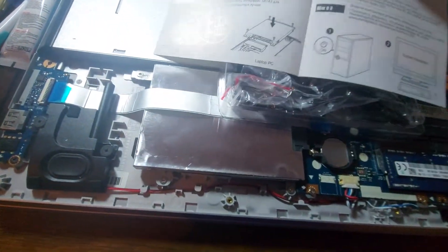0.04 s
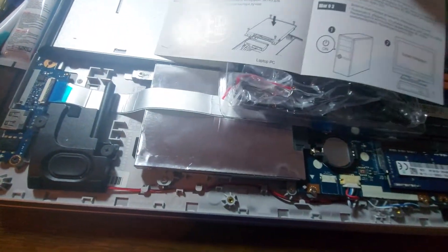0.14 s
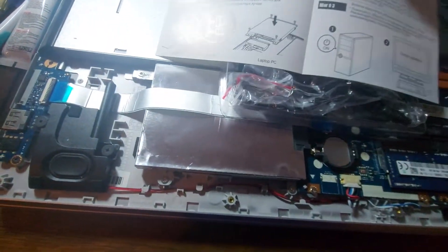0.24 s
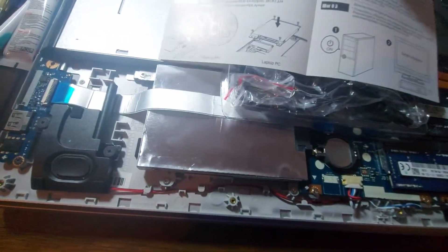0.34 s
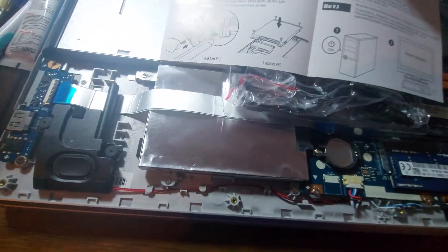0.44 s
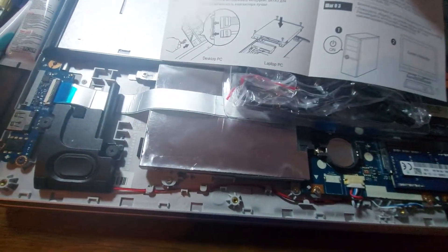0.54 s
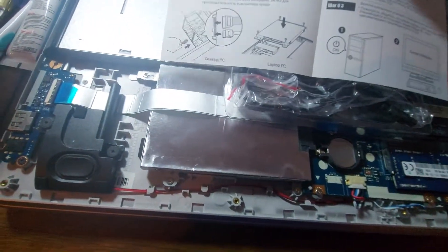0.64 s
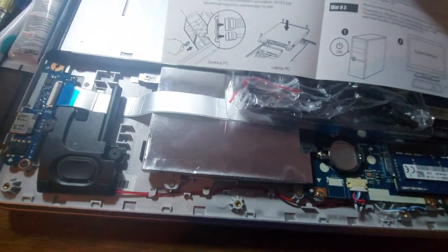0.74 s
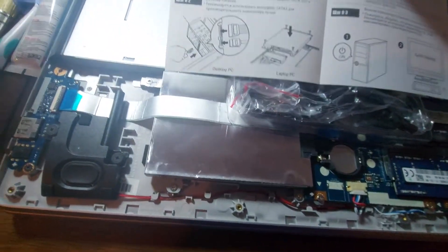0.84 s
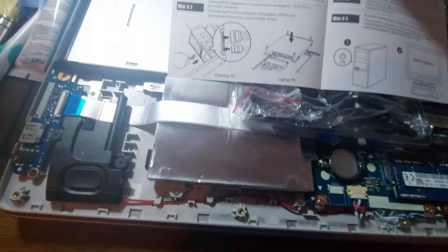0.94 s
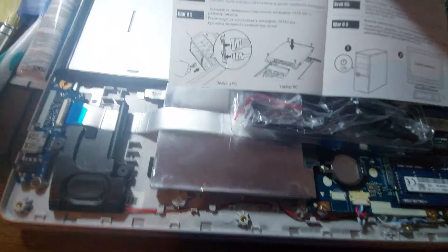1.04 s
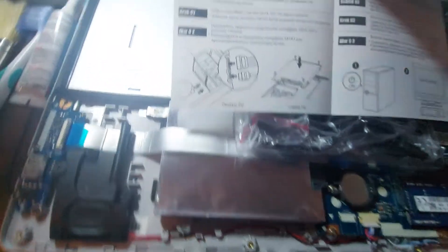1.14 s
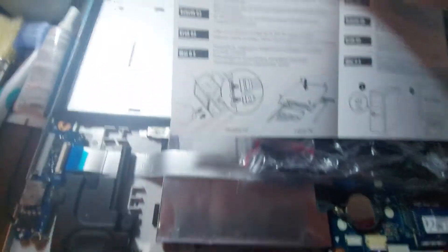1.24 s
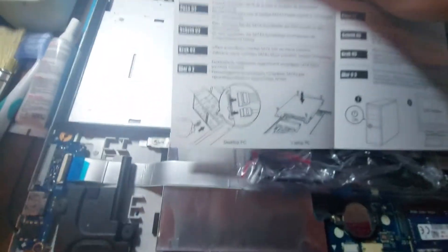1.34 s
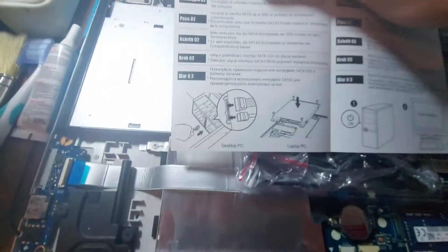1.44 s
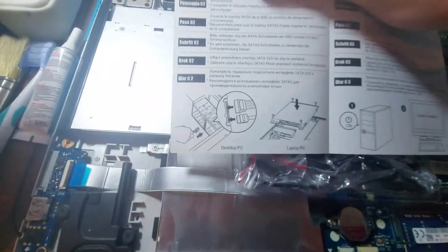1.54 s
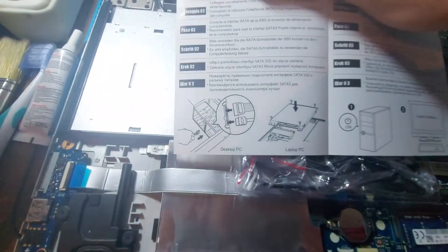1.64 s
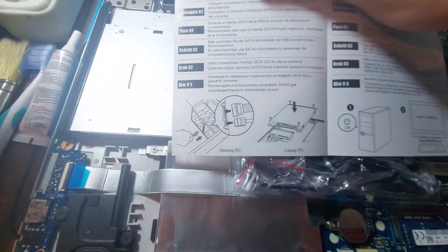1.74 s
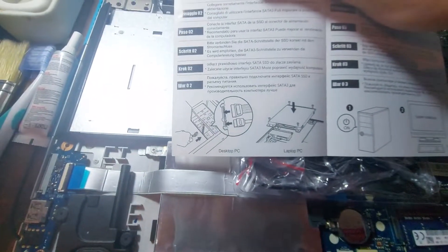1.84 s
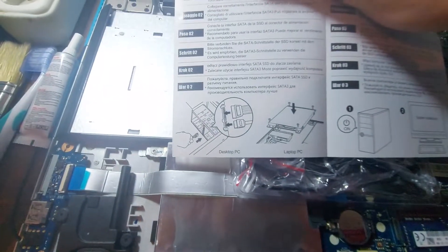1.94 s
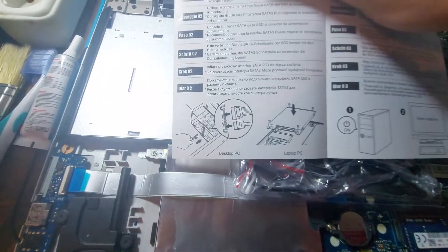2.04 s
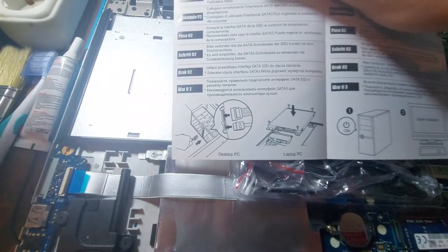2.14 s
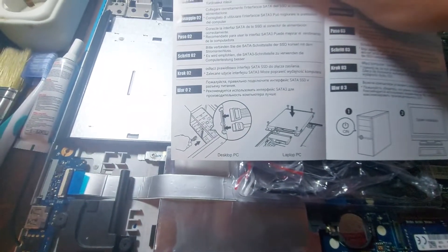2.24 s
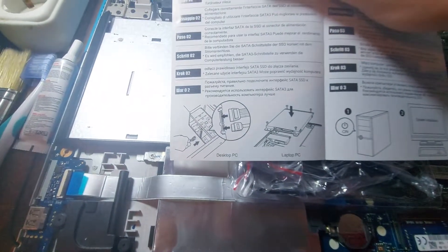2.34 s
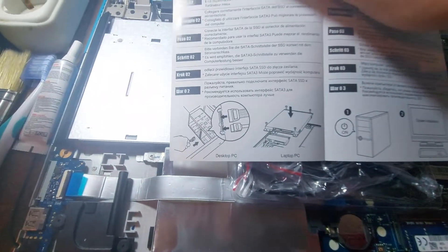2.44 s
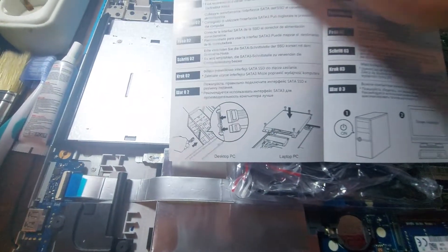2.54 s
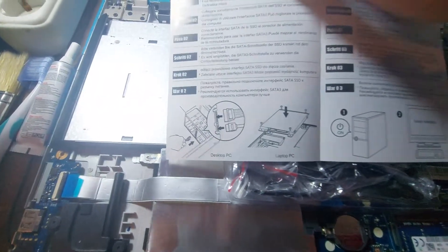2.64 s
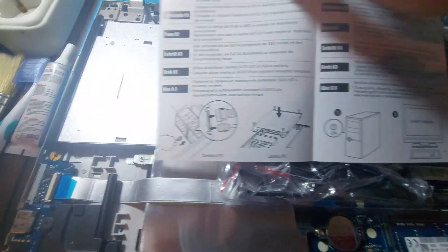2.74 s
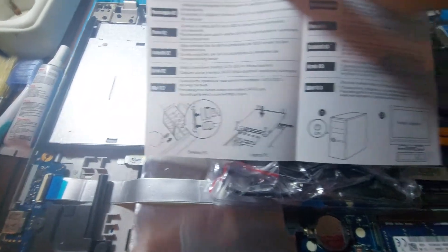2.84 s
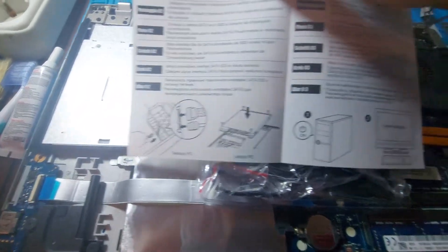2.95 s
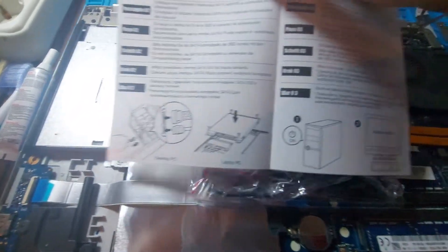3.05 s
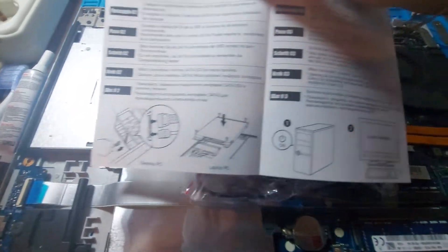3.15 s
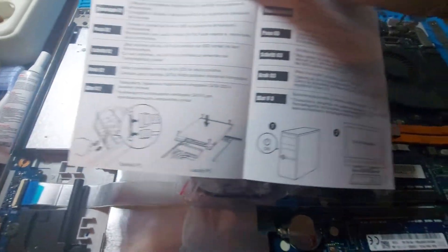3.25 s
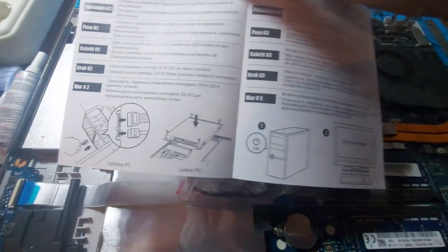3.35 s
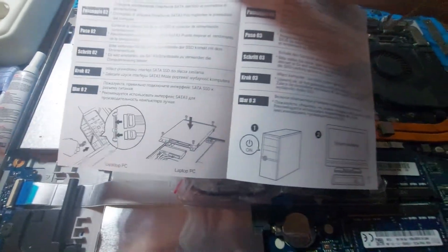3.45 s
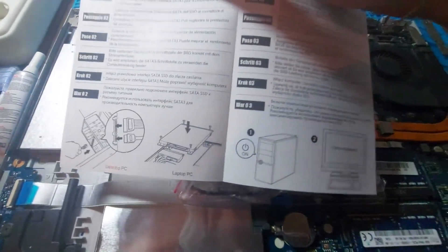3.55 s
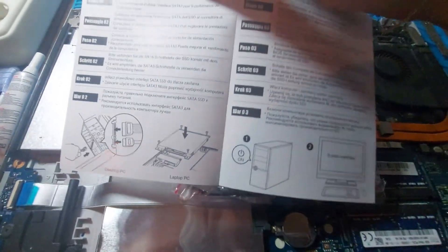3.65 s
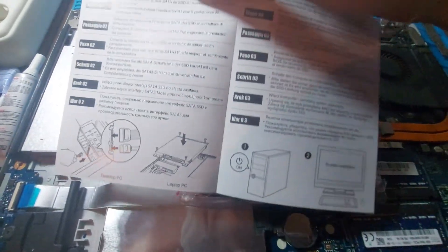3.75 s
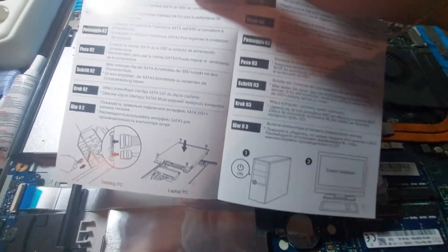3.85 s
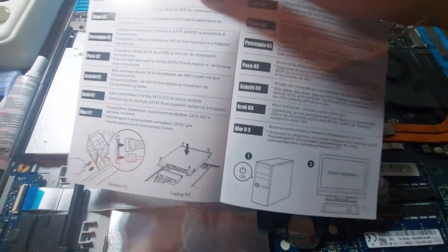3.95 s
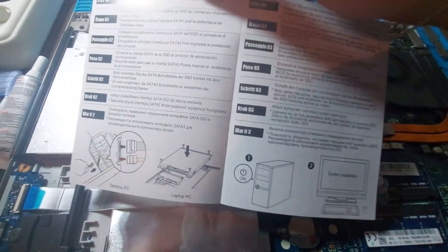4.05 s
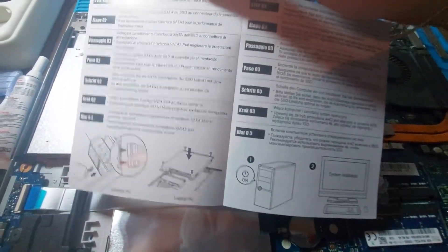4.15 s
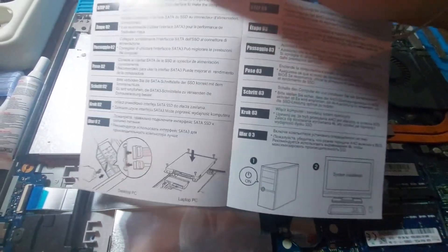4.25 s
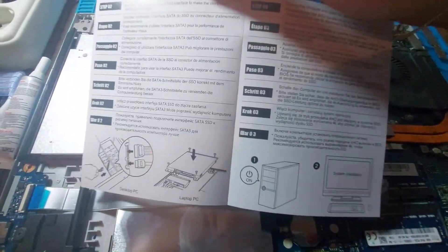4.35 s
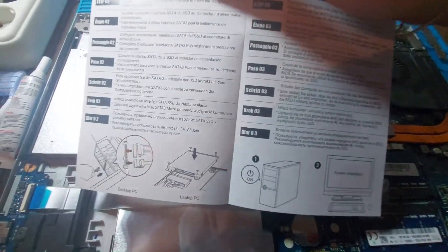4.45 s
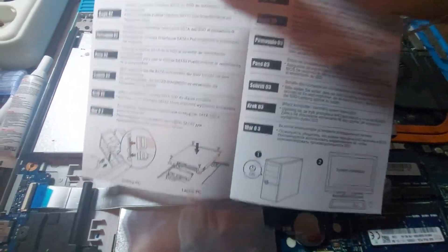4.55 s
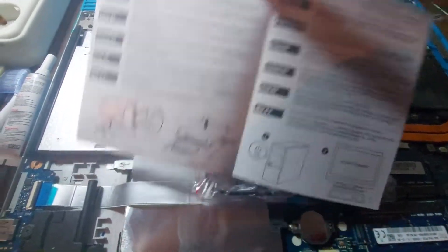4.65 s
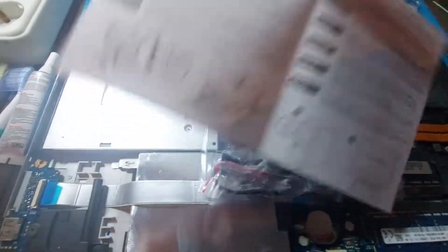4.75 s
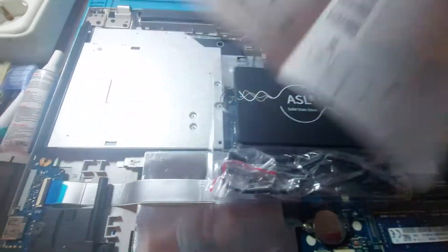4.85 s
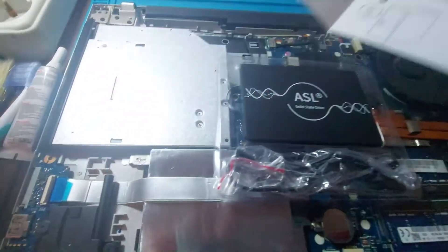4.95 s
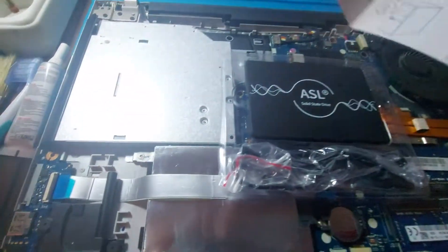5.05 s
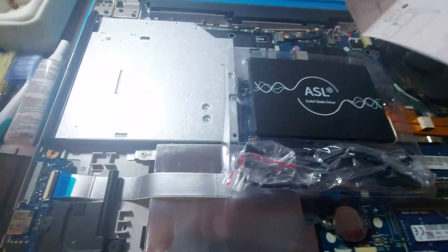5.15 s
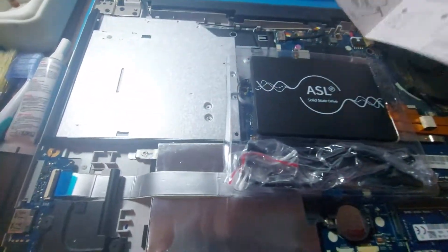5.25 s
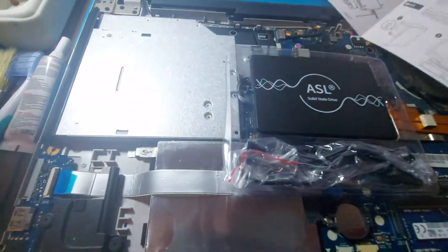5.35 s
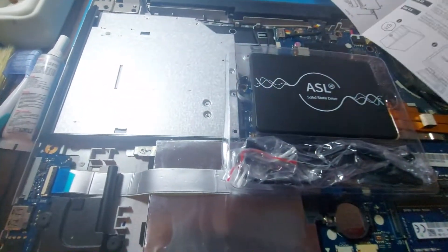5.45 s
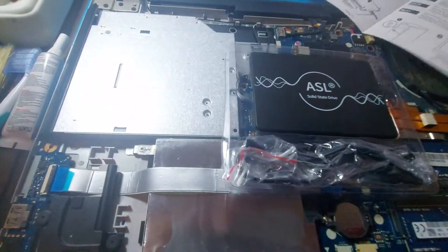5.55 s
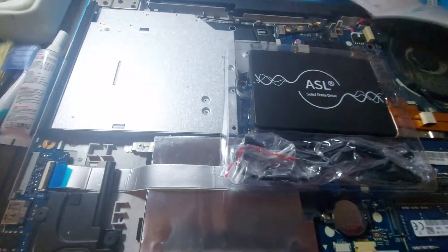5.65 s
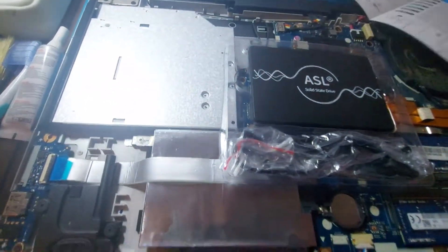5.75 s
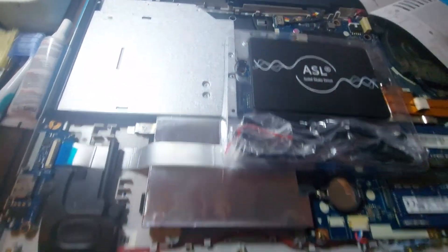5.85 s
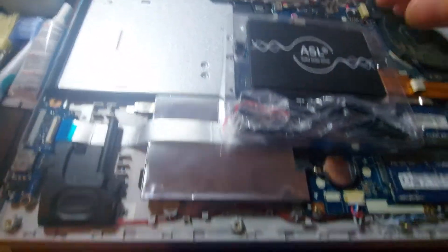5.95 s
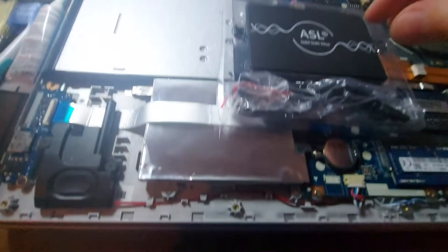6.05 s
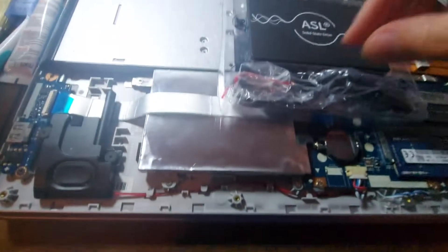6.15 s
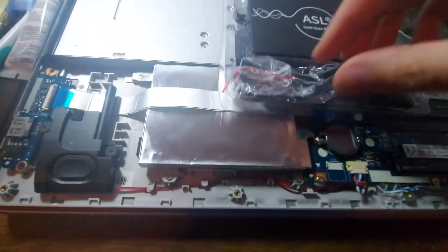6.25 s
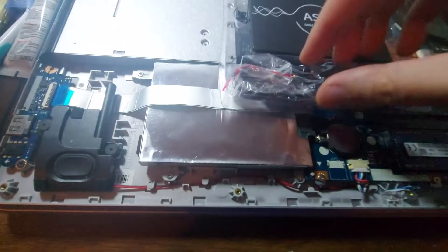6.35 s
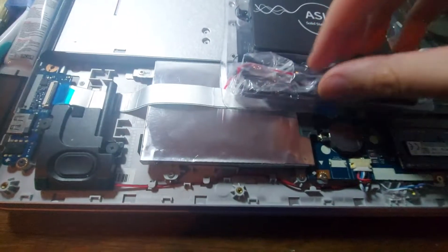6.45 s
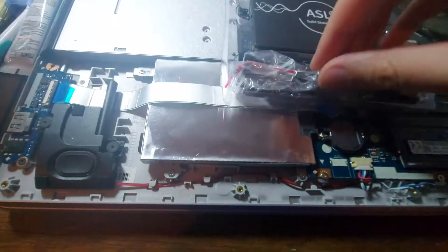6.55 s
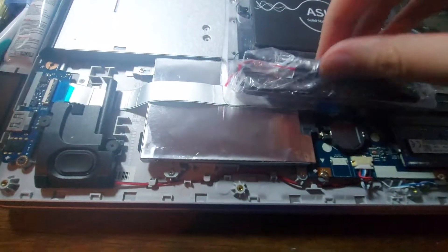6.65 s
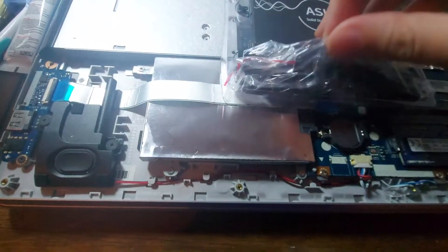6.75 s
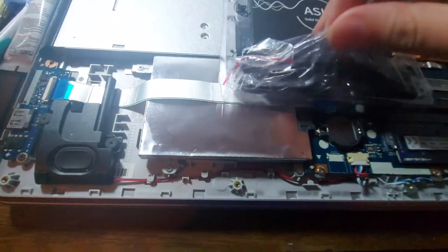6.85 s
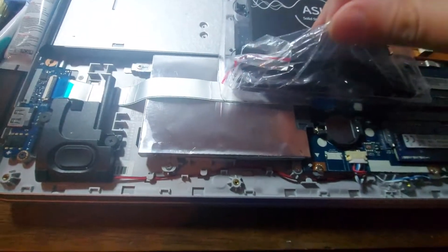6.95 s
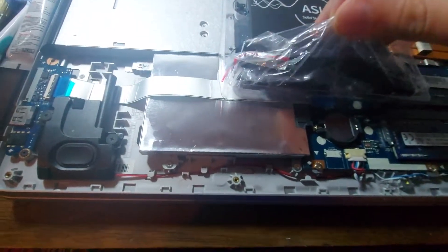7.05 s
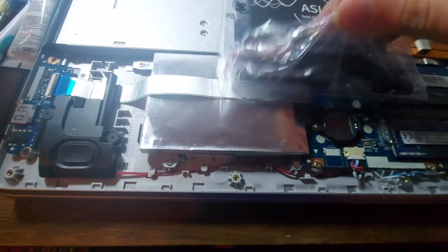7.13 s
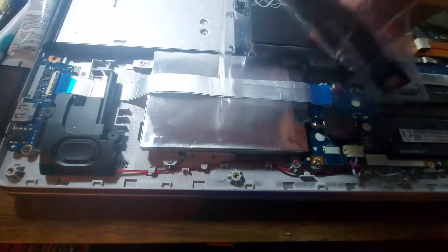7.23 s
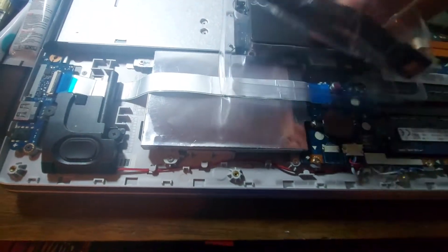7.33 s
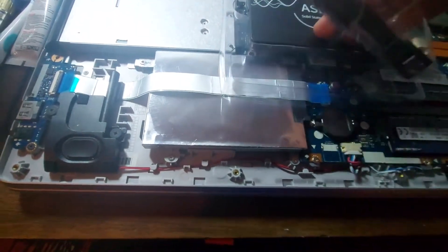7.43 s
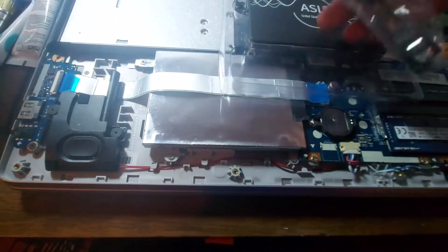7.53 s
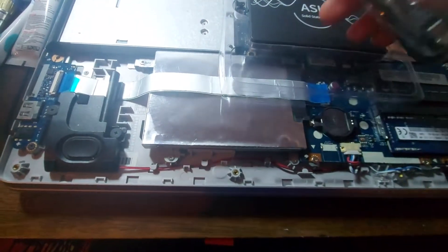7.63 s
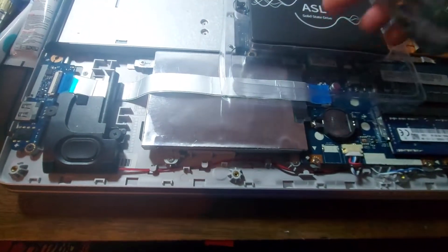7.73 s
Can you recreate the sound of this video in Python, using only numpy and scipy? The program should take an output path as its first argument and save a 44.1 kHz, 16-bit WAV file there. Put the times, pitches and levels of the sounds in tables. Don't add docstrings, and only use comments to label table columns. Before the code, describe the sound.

Close stereo pickup in a small quiet room with a faint, low fan hum. A glossy leaflet gives a small crease and soft finger slides, then long near-silence with sparse ticks. It is turned and folded with papery snaps and swishes, then a thin plastic bag is pinched and pulled, crackling brightly and much louder, ending with scattered tray clicks.

```python
import sys
import numpy as np
from scipy import signal
from scipy.fft import rfft, irfft, next_fast_len
from scipy.io import wavfile

SR = 44100
rng = np.random.default_rng(int(sys.argv[2]) if len(sys.argv) > 2 else 0)


def convert_level_to_amplitude(level_db):
    exponent = np.asarray(level_db, float) / 20
    return 10 ** exponent


def int16_out(signal):
    q = np.round(np.clip(np.atleast_2d(signal).T, -1, 1) * 32767)
    wavfile.write(sys.argv[1], SR, q.astype(np.int16))


N = 343539
LEFT_RIGHT = np.array([[1], [-1]])


def pan(left_over_right_db):
    return convert_level_to_amplitude(left_over_right_db / 2 * LEFT_RIGHT)


def at_hz(points, hz):
    point_hz, value = np.transpose(points)
    return np.interp(np.log(hz), np.log(point_hz), value)


def rms_one(x):
    return x / np.sqrt(np.mean(x ** 2) + 1e-20)


def drift(rate):
    targets = rng.standard_normal(int(8 * rate) + 2)
    return rms_one(np.interp(np.arange(N) * rate / SR, np.arange(len(targets)), targets))


def resonance(x, hz, width_hz):
    r = np.exp(-np.pi * width_hz / SR)
    feedback = [1, -2 * r * np.cos(2 * np.pi * hz / SR), r * r]
    return signal.lfilter([(1 - r * r) / 2, 0, (r * r - 1) / 2], feedback, x)


def pair(two, alike):
    alike = np.clip(alike, -.99, .99)
    shared = np.sqrt(1 + alike) * two[0]
    opposed = np.sqrt(1 - alike) * two[1] * LEFT_RIGHT
    return (shared + opposed) / np.sqrt(2)


def moves(rows):
    rows, t = np.array(rows), np.arange(N) / SR
    current = np.maximum(np.searchsorted(rows[:, 0], t, "right") - 1, 0)
    start, rise, level_db, fade, *more = rows[current].T
    late = t - start - rise
    swell_db = 12.5 * late / np.maximum(rise, .001)
    under_db = np.where(late < 0, swell_db, -fade * late)
    return np.where(t < start, -140, level_db), np.maximum(under_db, -90), *more


def grains(per_s, spread_db, clump_db, grain_s, smooth, likeness):
    born = rng.random(N) < per_s * convert_level_to_amplitude(clump_db * drift(40)) / SR
    power = born * convert_level_to_amplitude(2 * spread_db * np.minimum(rng.exponential(1, N), 4))
    fade = np.exp(-1 / (grain_s * SR))
    gate = np.sqrt(smooth + signal.lfilter([1], [1, -fade], rms_one(power) + 1e-18))
    return [rms_one(gate * pair(rng.standard_normal((2, N)), alike)) for alike in likeness]


def add_crease(drive, s, levels_db, ring_band, ring_hz, t60, pan_db, ring_share, likeness, click, lag,
               top_hz=SR * .45):
    at, t = int(s * SR), np.arange(3000) / SR
    noise = rng.standard_normal((3, 2, len(t)))
    for band, (db, life) in enumerate(zip(levels_db, [1.4, 1, .6])):
        burst = pair(noise[band], likeness[band]) * convert_level_to_amplitude(-60 * t / (t60 * life))
        burst[:, 0] = click
        if band == 2:
            burst = signal.lfilter(*signal.butter(2, min(top_hz, SR * .45), fs=SR), burst)
        if band == ring_band:
            ring = resonance(burst, ring_hz, ring_hz / 5)
            burst = burst + ring_share * ring * np.sqrt(np.sum(burst ** 2) / np.sum(ring ** 2))
        burst = burst * convert_level_to_amplitude(db) * pan(pan_db)
        for port, start in enumerate([at + lag, at]):
            drive[band, port, start:start + len(t)] += burst[port, :N - start]


def coloured(drive, bands_hz, colour, sides, size=2048):
    hz, out = np.maximum(np.arange(size // 2 + 1) * SR / size, 10), 0
    for part, (low_hz, high_hz) in zip(drive, bands_hz):
        edges = np.sqrt((1 + (low_hz / hz) ** 8) * (1 + (hz / high_hz) ** 8))
        shape = convert_level_to_amplitude(at_hz(colour, hz)) / edges + 1e-9
        ports = shape / np.sqrt(np.mean(shape ** 2)) * pan(at_hz(sides, hz))
        cepstrum = irfft(np.log(ports))
        cepstrum[:, 1:size // 2] *= 2
        cepstrum[:, size // 2 + 1:] = 0
        response = irfft(np.exp(rfft(cepstrum)))
        out = out + signal.oaconvolve(part, response, axes=1)[:, :N]
    return out


# f/Hz, level/dB
AIR_COLOUR = [(25, -24), (50, -6.5), (110, -15.5), (250, -24), (400, -17), (680, -23.5), (900, -32),
              (1600, -28), (2300, -36), (2600, -44), (6000, -51.5), (9000, -46), (12500, -39),
              (14700, -48.5), (15200, -71)]
# f/Hz, likeness/1
AIR_LIKENESS = [(60, 0.89), (130, 0.91), (290, 0.29), (640, 0.18), (1410, 0.77), (3100, -0.35),
                (6820, -0.048), (15000, 0.19)]
# f/Hz, left over right level/dB
AIR_SIDES = [(60, -2.5), (130, -2.0), (290, 0.0), (640, 0.5), (1410, 10.5), (3100, 3.5), (6820, -2),
             (15000, 6.5)]
# f/Hz, width/Hz, level/dB, likeness/1
HUM = [(63.9, 8, -67.5, .9), (72, 19, -67, 1), (145, 10.8, -63, 0.97), (213.1, 7.9, -74, 1),
       (287.4, 26, -67, 1), (309.5, 28, -67, 1), (478, 40, -79, 0.49), (574, 20, -79, 0.94)]
# t/s, level/dB
SWELL = [
    (0.0, -59),
    (0.52, -62.5),
    (1.71, -59),
    (1.99, -62.5),
    (2.93, -59.5),
    (4.47, -64.5),
    (4.88, -60),
    (5.79, -64),
    (7.79, -61.5),
]


def room_tone():
    hz = np.maximum(np.arange(N // 2 + 1) * SR / N, 10)
    two = rfft(rng.standard_normal((2, N))) * convert_level_to_amplitude(at_hz(AIR_COLOUR, hz))
    ports = pair(two, at_hz(AIR_LIKENESS, hz)) * pan(at_hz(AIR_SIDES, hz))
    air = convert_level_to_amplitude(-66) * rms_one(irfft(ports, N))
    white = rng.standard_normal((2, N))
    swell_db = np.interp(np.arange(N) / SR, *np.transpose(SWELL)) + 61
    for mode_hz, width_hz, db, alike in HUM:
        mode = resonance(pair(white, alike), mode_hz, width_hz)
        mode = rms_one(resonance(mode, mode_hz, 1.63 * width_hz))
        level_db = db + (mode_hz < 200) * swell_db
        air = air + convert_level_to_amplitude(level_db) * pan(at_hz(AIR_SIDES, mode_hz)) * mode
    return np.array([np.roll(air[0], 17), air[1]])


def room(x):
    t60_s, wall_cut_hz, level_db = 0.15, 1330, -9.5
    size = next_fast_len(N + SR)
    w = 2 * np.pi * np.arange(size // 2 + 1) / size
    dull = 1 / (1 + 1j * w * SR / (2 * np.pi * wall_cut_hz))
    loops = np.zeros((2, len(w)), complex)
    for k, lag in enumerate((rng.uniform(.006, .03, 12) * SR).astype(int)):
        turn = dull * convert_level_to_amplitude(-60 * lag / SR / t60_s) * np.exp(-1j * w * lag)
        loops[k % 2] += (-1) ** (k // 2) * turn / (1 - turn)
    return convert_level_to_amplitude(level_db) * irfft(loops * rfft(x.mean(axis=0), size), size)[:, :N]


# t/s, peak level/dB, length/s
THUMPS = [
    (2.79, -32, 0.15),
    (5.296, -40, 0.081),
    (7.14, -38, 0.25),
]


def thumps():
    t = np.arange(N) / SR
    low = rms_one(resonance(resonance(rng.standard_normal(N), 52, 40), 74, 44))
    swell = 0
    for s, db, length in THUMPS:
        third = length / 3
        swell = swell + convert_level_to_amplitude(db - 17) * np.exp(-((t - s - third) / third) ** 2)
    return low * swell


# t/s, rise/s, hiss level/dB, fade/(dB/s)
GLIDE = [(0.0, .02, -80.5, 14), (.8, 0.042, -74, 284), (2.75, 0.029, -77, 34), (3.55, 0.17, -63.5, 99),
         (3.95, .003, -82, 46), (4.61, 0.051, -60.5, 220), (4.83, .003, -64.5, 49), (5.3, .003, -76, 60.5),
         (5.47, .01, -73, 80), (5.57, 0.0081, -68.5, 156), (5.666, .002, -74, 103)]


def glide():
    port_hz, width_hz = 11800, 2500
    hiss = grains(1500, 1.5, 2.5, .002, .7, [.1])[0]
    hiss = resonance(resonance(hiss, port_hz, width_hz), port_hz, 0.88 * width_hz)
    level_db, under_db = moves(GLIDE)
    return convert_level_to_amplitude(level_db + under_db - 1) * rms_one(hiss)


# t/s, rise/s, level/dB, fade/(dB/s), f/Hz
SWISH = [(0.0, 0.0011, -53, 218, 2130), (1.3, .02, -76, 100, 1800), (1.678, 0.0043, -68, 500, 1800),
         (1.72, 0.04, -88, 53, 1800), (2.92, 0.07, -78, 90, 1750), (3.57, 0.07, -67, 80, 1900),
         (3.72, 0.01, -66.5, 50, 1700), (3.77, 0.028, -66.5, 100, 1670), (4.95, 0.004, -59, 68, 1980),
         (5.03, 0.0088, -68, 64, 1880), (5.95, 0.11, -67, 41, 1590)]
# t/s, rise/s, level/dB, fade/(dB/s), f/Hz
EDGE = [(.25, 0.03, -93, 83, 3400), (.63, .05, -86, 90, 2970), (1.678, .004, -77, 500, 3370),
        (2.92, 0.071, -75, 100, 3070), (3.0, 0.011, -79, 85, 3030), (3.56, 0.077, -70, 90, 3080),
        (3.69, 0.034, -68.5, 60, 3120), (3.77, 0.026, -71, 203, 4240), (4.95, .005, -79, 100, 4200),
        (5.03, .02, -85, 63, 3280), (6.03, 0.034, -87, 120, 3300)]


def swish():
    q, overtone, overtone_db = 4.6, 2.13, -26.5
    rub, out = grains(900, 1.5, 2.5, .003, .7, [.5])[0], 0
    for rows in (SWISH, EDGE):
        level_db, under_db, pitch_hz = moves(rows)
        for hz in {row[-1] for row in rows}:
            width_hz, high_hz = hz / q, overtone * hz
            band = rms_one(resonance(resonance(rub, hz, width_hz), hz, width_hz))
            high = rms_one(resonance(resonance(rub, high_hz, width_hz), high_hz, width_hz))
            band = band + convert_level_to_amplitude(overtone_db) * high
            out = out + band * (pitch_hz == hz) * convert_level_to_amplitude(level_db + under_db)
    return pan(5) * out


# t/s, peak level/dB, f/Hz, t60/s
PINGS = [(4.606, -46, 1840, 0.01), (4.738, -46, 2160, 0.025), (4.858, -39, 2030, 0.023),
         (4.859, -48, 4500, .01), (4.94, -54, 4400, 0.013), (4.942, -42, 400, 0.016),
         (4.952, -41.5, 1990, 0.021), (4.951, -55, 4260, 0.014), (4.97, -43, 2000, 0.025),
         (4.973, -57, 4160, 0.013), (5.112, -33, 845, 0.019), (5.127, -35.5, 990, 0.018),
         (5.138, -40, 890, 0.018), (4.958, -48, 2100, .015), (4.744, -41, 1940, 0.033),
         (4.604, -42, 2500, .006), (5.303, -27, 1410, 0.019), (5.303, -29.5, 2440, .014),
         (5.305, -35.5, 1760, 0.024), (5.31, -39, 1030, 0.03), (5.511, -48, 1623, 0.042),
         (5.63, -35, 1540, 0.027), (5.639, -29, 1530, 0.02), (5.649, -49, 1533, .12),
         (5.672, -35.5, 1323, 0.05), (5.693, -25.5, 1590, 0.019), (5.707, -48, 1500, .05),
         (6.502, -45, 930, 0.025), (6.722, -27.5, 850, 0.033), (6.762, -35, 826, 0.044),
         (6.864, -21.5, 3780, 0.01), (6.905, -39, 810, 0.052), (6.993, -35.5, 1200, 0.025),
         (7.073, -29.5, 900, 0.014), (.003, -49, 2260, 0.024), (.021, -52, 4200, .01),
         (.063, -54, 3580, .012), (0.077, -60, 3400, .01), (.103, -54, 4200, .01), (2.767, -56, 3480, .012),
         (2.794, -53, 1280, 0.017), (2.82, -45, 1770, 0.021), (2.822, -57, 3370, .02),
         (2.845, -55, 3200, 0.014), (4.677, -48, 3230, .015), (4.874, -57, 3530, .015),
         (5.303, -44, 305, 0.15), (6.345, -53, 3150, .015), (6.651, -34, 2250, .02),
         (6.658, -33, 2000, .025), (7.201, -33.5, 263, 0.051), (7.302, -29.5, 850, 0.013),
         (7.475, -46, 400, 0.12)]


def pings():
    out, t = np.zeros((2, N)), np.arange(6000) / SR
    rise = 1 - np.exp(-(t / 0.00084) ** 2)
    for s, db, hz, t60 in PINGS:
        note = convert_level_to_amplitude(db - 60 * t / t60) * rise * np.sin(2 * np.pi * hz * t)
        start = int(s * SR)
        out[:, start:start + len(t)] += note * pan(6)
    return out


# t/s, rise/s, level/dB, fade/(dB/s), crispness/dB
PAPER = [(0.0, 0.0004, -59, 63, -4), (.14, 0.0052, -74, 48, -5), (.27, 0.027, -71.5, 62, -5),
         (.62, 0.012, -77.5, 22, -4.5), (.83, 0.005, -75, 117, 0.5), (2.764, 0.056, -61, 200, -10),
         (2.88, 0.045, -74.5, 71, -1), (3.42, 0.0041, -73.5, 94, -2), (3.55, 0.09, -69, 113, -3.5),
         (3.72, 0.058, -66, 143, 1.5), (3.9, .003, -81, 12, -12), (4.6, 0.057, -63.5, 4, -5.5),
         (4.72, 0.0061, -55, 202, -8.5), (4.83, 0.019, -53, 167, -11.5), (4.91, 0.12, -61.5, 38, -2),
         (5.09, 0.032, -57, 30, -15), (5.15, 0.0026, -66, 89, -10.5), (5.3, 0.001, -52.5, 300, -5.5),
         (5.33, 0.0087, -56.5, 156, -8), (5.47, 0.13, -64.5, 4, -6.5), (5.62, 0.093, -60.5, 216, -10.5),
         (5.85, 0.25, -73.5, 32, -10), (6.27, 0.073, -69, 62, -9)]
# t/s, peak level/dB,
# crispness/dB, ring f/Hz
CREASES = [(.0024, -36, -31, 2180), (0.02, -63, -9, 2300), (0.064, -54, 0, 2400), (0.078, -40.5, -13, 850),
           (0.103, -59, 5.5, 1540), (0.216, -58, -11, 1250), (.588, -57, -9, 1550), (0.723, -53, -10, 1690),
           (0.84, -46.5, -10, 1880), (1.1061, -55, -14, 1990), (2.766, -45, -11.5, 860),
           (2.81, -43, -25, 1290), (2.831, -58, 0, 1570), (2.8452, -59, -2, 875), (3.043, -56, -14, 1830),
           (3.1791, -56, -13, 1750), (3.431, -65, 9, 3830), (3.4433, -52, -10, 790),
           (3.8819, -44.5, -37, 760), (3.9443, -54, -15.5, 1740), (4.1904, -51.5, -17, 1800),
           (5.863, -68.5, -3, 9150), (6.087, -68, 4, 1520), (6.347, -45, -19, 2040),
           (4.608, -28, -21.5, 1620), (4.629, -38.5, -14, 706), (4.679, -61.5, 9, 1770),
         (4.705, -38, -11.5, 501), (4.727, -48, -2, 598), (4.738, -34.5, -34, 2250), (4.834, -51, -2, 1790),
         (4.844, -42.5, -9, 1010), (4.858, -42, -2.5, 1960), (4.885, -31, -18, 910),
         (4.953, -43.5, -7, 2010), (4.969, -51, -3, 1990), (5.095, -41.5, -35, 990),
         (5.132, -37.5, -10, 724), (5.301, -23, -16.5, 720), (5.362, -39, -16, 580),
         (5.377, -61, -12, 2000), (5.484, -49, -12, 1310), (5.509, -49, -24, 1640), (5.586, -45, -15, 760),
         (5.629, -28, -18.5, 750), (5.639, -30, -24, 754), (5.668, -50.5, 4, 1190), (5.674, -37, -22, 700),
         (5.684, -25.5, -26, 650), (5.7, -56, -40, 2000), (5.738, -52, -24, 1550)]
# from f/Hz, to f/Hz
PAPER_BANDS_HZ = [(80, 900), (900, 3300), (3300, 16500)]
# f/Hz, level/dB
PAPER_COLOUR = [(60, -12), (80, 2.5), (220, -4.5), (310, -1.5), (780, -9), (1600, -11), (2300, -17),
                (2700, -20.5), (3400, -19.5), (4400, -25.5), (6000, -30), (9000, -27), (13000, -27),
                (15600, -31.5), (16200, -58)]
# f/Hz, left over right level/dB
PAPER_SIDES = [(60, 0.5), (150, 0.5), (380, -2), (950, 4), (2380, 15.5), (5980, -6), (15000, 5)]


def paper():
    body_db, under_db, crisp_db = moves(PAPER)
    flap_db = -3 - 0.74 * crisp_db + 0.74 * under_db
    high_db = crisp_db + 1.3 * under_db
    rustle = grains(700, 2.0, 3.5, .002, .4, [.9, .6, .1])
    drive = np.array([convert_level_to_amplitude(body_db + db + 2) * g for db, g in zip([flap_db, under_db, high_db], rustle)])
    for s, db, crisp, ring_hz in CREASES:
        thud_db = -56.5 + 0.7 * (db + 43) + 0.5 * np.log2(ring_hz / 1000)
        ring_band = 1 + (ring_hz > PAPER_BANDS_HZ[1][1])
        click = max(11.8 + 0.1 * (db + 25.5), 3)
        top_hz = 12200 * convert_level_to_amplitude(0.5 * crisp)
        add_crease(drive, s, [thud_db, db - 17.5, db + crisp - 2.5], ring_band, ring_hz, t60=.02, pan_db=0,
                   ring_share=.55, likeness=[.9, .7, .3], click=click, lag=5, top_hz=top_hz)
    return coloured(drive, PAPER_BANDS_HZ, PAPER_COLOUR, PAPER_SIDES)


def buckles(level_db, per_s, pan_db):
    facets, cycles = 14, 63
    born = rng.random(N) < per_s * convert_level_to_amplitude(4 * drift(25)) / SR
    pops = born * convert_level_to_amplitude(3.8 * np.minimum(rng.exponential(1, N), 4))
    dealt = rng.integers(0, facets, N)
    places_db = pan_db + 3.7 * rng.standard_normal(facets)
    out = 0
    for k, hz in enumerate(np.geomspace(1258, 5260, facets)):
        ring = resonance(pops * (dealt == k) + 1e-18, hz, 0.5 * hz / cycles) / hz
        out = out + ring * pan(places_db[k])
    return convert_level_to_amplitude(level_db) * rms_one(out)


# t/s, rise/s, level/dB, fade/(dB/s), fizz/dB
FILM = [(6.44, 0.025, -69, 3, -5.5), (6.612, .002, -68.5, 61, -5), (6.645, 0.041, -53.5, 22, -3.5),
        (6.718, 0.0036, -48.5, 4, -2), (6.79, 0.0024, -53, 11.5, -5.5), (6.868, 0.0022, -56.5, 100, -13),
        (6.886, .002, -59.5, 61, -5.5), (6.968, .002, -55.5, 100, -4.5), (6.983, .002, -53.5, 150, -5),
        (7.028, .002, -51, 152, -10), (7.047, .002, -49.5, 102, -4), (7.057, .002, -66.5, 399, -15),
        (7.07, 0.0018, -56, 252, -2.5), (7.088, .002, -56, 58.5, 1), (7.15, 0.0023, -44.5, 91.5, 3.5),
        (7.216, 0.0031, -55, 46, -5.5), (7.32, 0.0035, -72.5, 14, -6), (7.59, 0.0026, -76, 221, -6)]
# t/s, body peak level/dB, crispness/dB
FILM_SNAPS = [(6.468, -44, -11), (6.475, -48, -3), (6.4867, -33.5, -8), (6.5031, -28.5, -5), (6.553, -36, 0.5),
              (6.5677, -36.5, 1), (6.579, -33, 1.5), (6.599, -37, -3), (6.608, -42, 1), (6.6474, -29, -16),
              (6.6587, -34.5, 4), (6.665, -37, -5), (6.682, -33.5, 4), (6.6903, -35.5, 1), (6.721, -22.5, -9),
              (6.7252, -28.5, 4), (6.7439, -20, -8), (6.7477, -28, 1), (6.763, -27.5, -4), (6.7671, -32, 4.5),
              (6.7725, -32, 0),
              (6.811, -40, 6), (6.8193, -27, -15), (6.823, -28, -5), (6.856, -26.5, -14), (6.865, -27.5, -2.5),
         (6.8851, -17.5, -5), (6.9024, -21.5, -9.5), (6.9123, -36, -3), (6.956, -45, 8),
         (6.9678, -18.5, -9), (6.984, -26, -14.5), (6.991, -41, -8), (7.004, -34, 3.5), (7.0284, -26.5, -4),
         (7.0338, -31, -11), (7.0481, -27.5, -7), (7.0542, -32.5, 7), (7.0705, -29.5, -0.5),
         (7.089, -27.5, 2), (7.0971, -30, -2), (7.1066, -29.5, 4.5), (7.1129, -34.5, 10),
         (7.1426, -30.5, -6.5), (7.1537, -15, -2.5), (7.191, -33, 3), (7.1975, -21, -3.5),
         (7.235, -34, 7.5), (7.2441, -34.5, 2), (7.289, -33, 3.5), (7.2935, -39, 3),
              (6.59, -42, -17), (6.651, -36, -9), (6.729, -24, -1.5), (6.784, -34.5, -5), (6.829, -28, -3),
          (6.917, -36, -4), (6.923, -30, -8), (6.936, -34, -5), (6.9866, -34, 6), (6.995, -25.5, -9),
          (7.01, -27.5, -8), (7.032, -33, 5), (7.039, -35, 0), (7.121, -33, -6), (7.2035, -31, 8),
          (7.211, -37.5, 7), (7.2734, -48, -9), (7.307, -32.5, -10), (6.359, -51.5, -17), (6.371, -56, -19),
          (6.381, -51, -22), (6.479, -42.5, 0.5), (6.675, -40, -17), (6.685, -42, -14), (7.221, -44, -2),
          (7.258, -51, 5), (7.494, -44, 3), (7.513, -42, -1), (7.568, -52, -11)]
# t/s, body peak level/dB, crispness/dB
TRAY = [(7.3347, -42, -2), (7.407, -37, -29), (7.441, -41, -14), (7.4605, -28, -6.5), (7.475, -32, -13),
        (7.494, -46, -12), (7.5, -23, -10.5), (7.5411, -24.5, -31), (7.582, -48.5, -1.5),
        (7.7264, -48.5, 3), (7.7452, -35, -10), (7.755, -44, -4), (7.7655, -29, -22), (7.7728, -39.5, -4),
        (7.7854, -30, -13)]
# from f/Hz, to f/Hz
FILM_BANDS_HZ = [(150, 900), (900, 4200), (4200, 16500)]
# f/Hz, level/dB
FILM_COLOUR = [(88, -50), (150, -27.5), (304, -7), (479, -19.5), (814, -9.5), (991, -8.5), (1930, 4.5),
               (2600, -3), (2870, 4.5), (4970, -1.5), (11800, 0), (15600, -2.5), (16500, -42)]
# f/Hz, left over right level/dB
FILM_SIDES = [(60, 5.5), (130, -8), (290, 0.5), (640, 0.5), (1410, 7.5), (3100, 5), (6820, -6.0),
              (15000, -1.5)]


def film():
    spread_db = 5.5
    body_db, under_db, fizz_db = moves(FILM)
    low_db = -2.5 + 0.65 * under_db
    high_db = fizz_db + 0.58 * under_db
    smooth = .12 + convert_level_to_amplitude(body_db + under_db + 44.5)
    crackle = grains(600, 2.6, 4.5, .0008, smooth, [.85, .5, .1])
    drive = np.array([convert_level_to_amplitude(body_db + db + 7) * g for db, g in zip([low_db, under_db, high_db], crackle)])
    for s, db, crisp in FILM_SNAPS:
        levels_db = [db - 20.5 + 0.19 * (db + 29.5), db - 10.5, db + crisp - .5]
        add_crease(drive, s, levels_db, 1, rng.uniform(1820, 2980), t60=.015,
                   pan_db=spread_db * rng.standard_normal(), ring_share=.3,
                   likeness=[.9, .6, .2], click=3.7, lag=3)
    for s, db, crisp in TRAY:
        add_crease(drive, s, [db - 13, db - 15.5, db + crisp - .5], 1, 1010, t60=.018,
                   pan_db=-0.1 + spread_db * rng.standard_normal(), ring_share=.7,
                   likeness=[.9, .6, .2], click=3.6, lag=3)
    sheet = coloured(drive, FILM_BANDS_HZ, FILM_COLOUR, FILM_SIDES)
    return sheet + buckles(body_db + under_db + 1, per_s=600, pan_db=3)


def scene():
    hands = glide() + swish() + pings() + paper() + film()
    return room_tone() + thumps() + room(hands) + hands


def top_cut(x):
    return signal.sosfilt(signal.butter(12, 16970, fs=SR, output="sos"), x)


def record(dry):
    return top_cut(dry)


dry = scene()
out = record(dry)
int16_out(out)
```